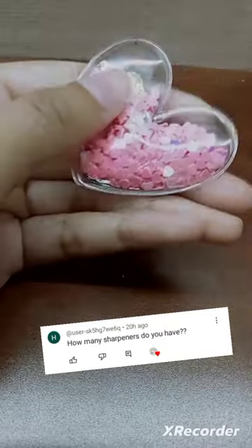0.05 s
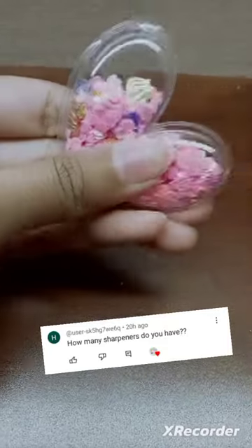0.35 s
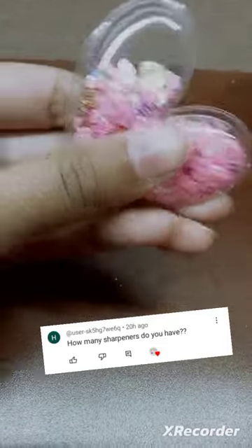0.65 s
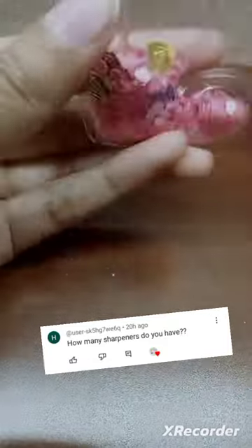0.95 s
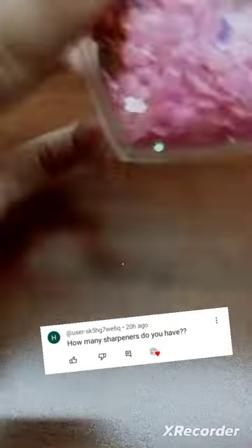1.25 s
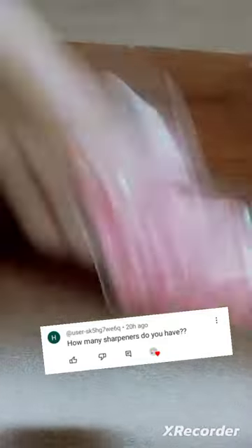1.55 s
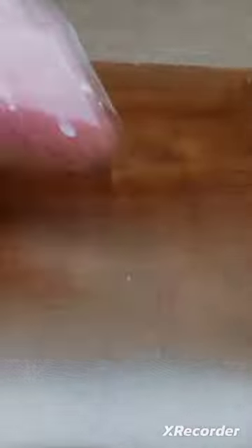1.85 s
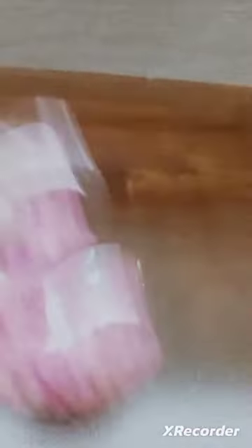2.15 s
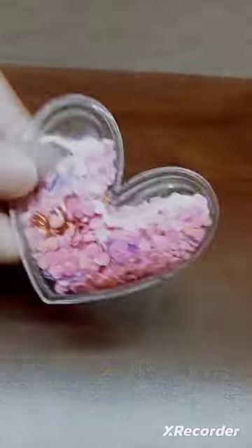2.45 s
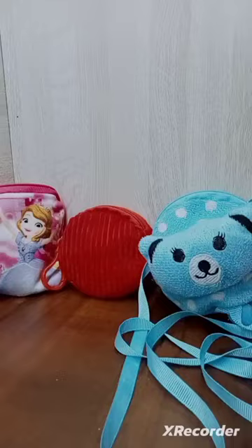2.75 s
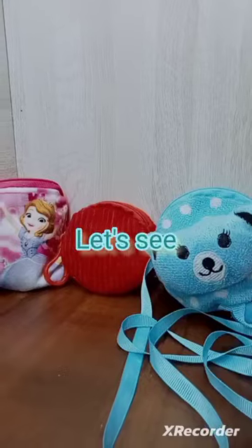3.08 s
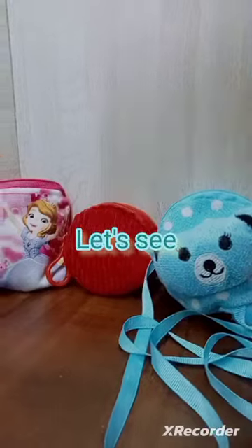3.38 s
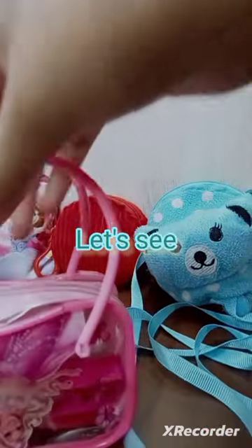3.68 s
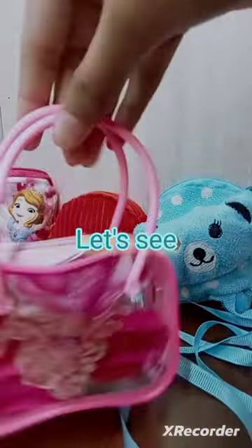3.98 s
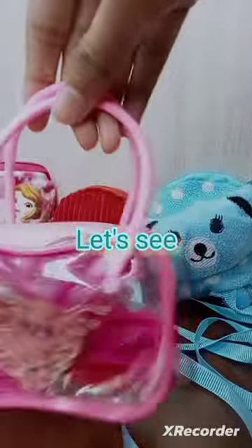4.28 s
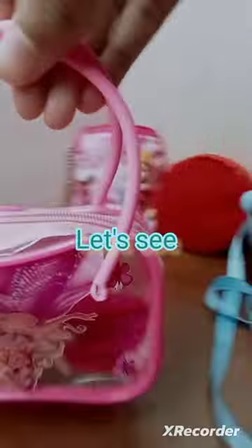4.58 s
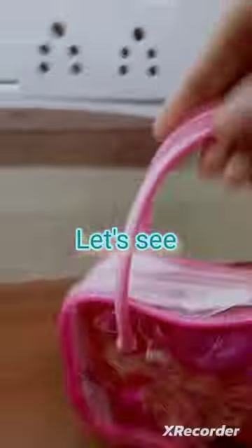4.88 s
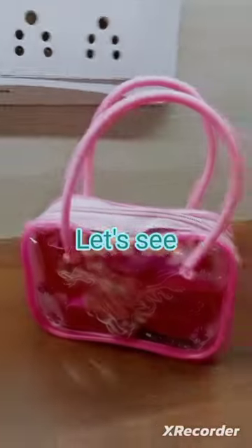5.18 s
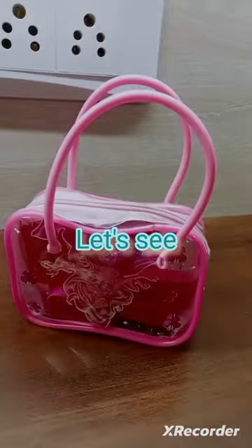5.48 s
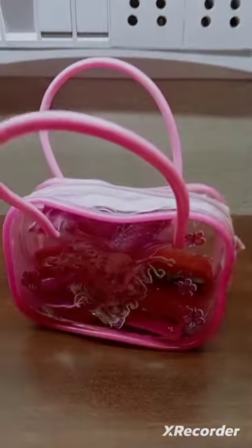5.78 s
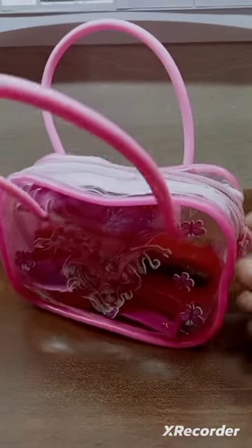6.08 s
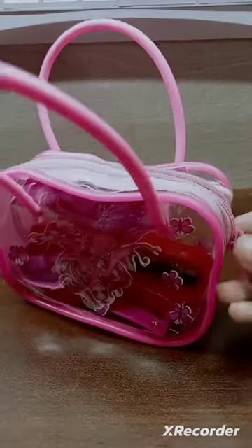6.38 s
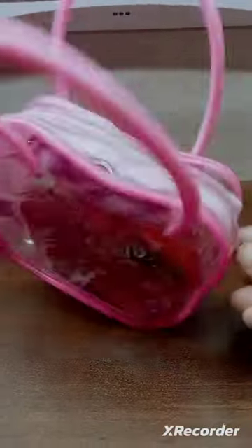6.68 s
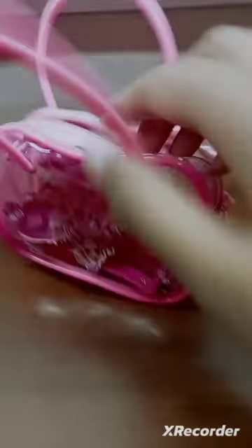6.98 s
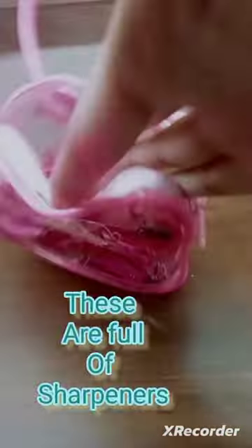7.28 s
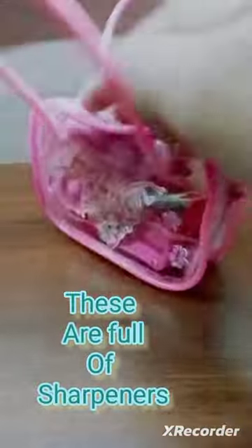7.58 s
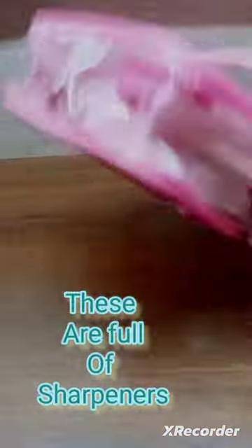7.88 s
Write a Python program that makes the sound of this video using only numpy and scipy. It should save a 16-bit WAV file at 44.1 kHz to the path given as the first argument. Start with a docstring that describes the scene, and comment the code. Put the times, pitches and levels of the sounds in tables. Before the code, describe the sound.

Close handling at a desk: soft sequin shakes, a bag set down with a thud, microphone rubbing, then plastic sharpeners clattering inside crinkling vinyl.

```python
"""Plastic things are handled over a wooden desk, close to a hand-held phone in a small, faintly humming room.
First a clear heart-shaped case ticks and its sequins swish, while shifting fingers bump the phone.
Next a vinyl bag of pencil sharpeners crinkles and scuffs as it is lifted, and is set down with a thud.
A finger then slides twice over the microphone.
Last, the bag is pushed and tipped, and the sharpeners clatter inside."""
import sys
import numpy as np
from scipy import signal
from scipy.fft import rfft, irfft
from scipy.io import wavfile

SR = 44100
rng = np.random.default_rng(int(sys.argv[2]) if len(sys.argv) > 2 else 0)


def waveform_to_disk(signal):
    """Save audio, clipped to [-1, 1], as 16-bit WAV at the path in sys.argv[1]."""
    frames = np.transpose(np.atleast_2d(signal))
    scaled = np.clip(frames, -1, 1) * 32767
    samples = np.round(scaled).astype(np.int16)
    wavfile.write(sys.argv[1], SR, samples)


N = 358974
TIME = np.arange(N) / SR

# the bag's motion in two gestures, carried and then pushed and tipped: time_s, effort_db, treble_db
HANDLING = [
    [(2.72, -62, -69.5), (2.81, -60, -60), (2.964, -53, -64), (3.244, -58, -65), (3.394, -47, -63),
     (3.562, -49.5, -65), (3.712, -39.5, -67), (3.842, -56, -49.5), (3.968, -54.5, -61), (4.29, -51, -57.5),
     (4.45, -45, -56)],
    [(5.5, -70, -69.5), (5.76, -58, -58.5), (6.04, -52.5, -59), (6.29, -47, -56), (6.44, -48.5, -75),
     (6.67, -72, -61), (6.82, -52, -60.5), (7.15, -35.5, -52), (7.81, -44, -56), (7.97, -36.5, -46),
     (8.14, -34.5, -57)],
]
USUAL_HANDLING_DB = -46.5
# knocks of the sharpeners in the bag: start_s, decay_s, level_db, weight_db, hardness_db
KNOCKS = [(2.8447, 0.0043, -47, 0, -6), (3.1707, 0.0019, -32, -17, -11), (3.3997, 0.008, -37.5, -6, -1.5),
          (3.4327, .0045, -46, 0, -0.5), (3.5597, 0.0066, -15, 1, -8), (3.5757, 0.0098, -25, 3, 0.5),
          (3.6097, 0.0043, -31, 2, -3), (3.6517, 0.0071, -34.5, 1, -3), (3.6677, 0.0086, -33.5, -2, 5),
          (3.7287, 0.0046, -29, -0.5, -3.5), (3.7957, .005, -32.5, 0, -1.5),
          (3.8687, .005, -41.5, -5.5, -25), (4.0599, 0.0087, -39.5, -8, -23),
          (4.2612, 0.005, -33, -5.5, -0.5), (4.3317, 0.0028, -43.5, -2.5, -2), (5.588, .002, -54, -10, -3),
          (6.0487, 0.0084, -43, -8, -18), (6.2627, .003, -38, -17, -14), (6.2907, 0.0015, -39, -14, -18),
          (6.3947, 0.0032, -39.5, 0.5, -8), (6.4177, 0.0059, -37.5, -7, -4.5),
          (6.4499, .003, -37, -13.5, -2), (6.6787, 0.027, -26, 0, -1.5), (6.7009, 0.0032, -14, -14.5, -10),
          (6.7167, 0.01, -21, -7, -3.5), (6.7937, 0.0027, -15.5, -6, -9.5), (6.8007, 0.014, -24.5, -7, 0),
          (6.8567, 0.0076, -33.5, -11, -8.5), (7.0697, .0023, -19, -3, -5), (7.0787, 0.015, -31, -5, -5),
          (7.1727, 0.0018, -32.5, -3, -7), (7.3947, 0.017, -29, -8, 1), (7.4087, 0.0088, -34, 1, 5),
          (7.4137, 0.0058, -27, 0, 6.5), (7.4397, 0.011, -29.5, -16, -11), (7.4587, 0.0084, -34, -13, -2),
          (7.5837, 0.004, -42, -18, -3.5), (7.6537, 0.0065, -34, -8, 0), (7.7217, 0.0058, -34, -26, -3.5),
          (7.7437, 0.0068, -37, -4, 6), (7.7599, 0.0054, -41.5, -7, 7), (7.7867, 0.011, -29.5, -23, -9),
          (7.8627, 0.0026, -16.5, -9.5, -4.5), (7.9007, 0.036, -40.5, 5, 10), (7.9322, 0.005, -39, -7, 12),
          (8.0031, 0.0026, -14, -6.5, -16), (8.0241, 0.0081, -27.5, -5, 4.5), (8.0377, 0.019, -26, -1, 9),
          (8.0647, 0.0075, -30, 3, 11.5), (8.1187, 0.0032, -37.5, 2.5, 1.5)]
# broad resonances of plastic shells, narrow ones of steel blades: pitch_hz, bandwidth_hz, gain_db
SHARPENER_MODES = [(298, 170, -7.5), (466, 95, -8), (668, 127, -6.5), (988, 150, 7.5), (1223, 58, 12.5),
                   (1350, 110, 13), (1593, 252, 10), (2150, 470, 3), (3080, 500, 0), (3250, 60, 12),
                   (3620, 520, 0), (4550, 260, -3), (5620, 11, -8), (6200, 62, -3), (6650, 140, 5.5),
                   (6810, 480, 0.5), (7270, 70, 8.5), (7600, 85, -0.5), (7835, 42, 2), (10700, 1600, -25),
                   (15000, 750, -37)]


def from_db(db):
    """Amplitude grows tenfold for every 20 dB."""
    return 10 ** (np.asarray(db) / 20)


def rms_one(x):
    """Division by the root mean square gives unit power."""
    return x / np.sqrt(np.mean(x ** 2) + 1e-20)


def band(x, low_hz, high_hz, order=3):
    """A causal band-pass filter attenuates what lies outside its two edges."""
    return signal.sosfilt(signal.butter(order, [low_hz, high_hz], "band", fs=SR, output="sos"), x)


def drift(knots_per_s):
    """Interpolation between random values gives a smooth fluctuation of unit power."""
    knots = rng.standard_normal(int(knots_per_s * N / SR) + 2)
    return rms_one(np.interp(TIME * knots_per_s, np.arange(len(knots)), knots))


def swell(centre_s, half_s):
    """A Gaussian envelope rises and falls symmetrically about its centre."""
    return np.exp(-np.minimum(((TIME - centre_s) / half_s) ** 2 / 2, 20))


def swells(rows):
    """Short envelopes add by superposition."""
    return sum(from_db(db) * swell(centre_s, half_s) for centre_s, half_s, db in rows)


def effort(gestures, usual_db):
    """Interpolation in decibels gives a gain per level column, relative to usual; silent between gestures."""
    gains = 0
    for rows in gestures:
        times_s, *columns = np.transpose(rows)
        gains += from_db([np.interp(TIME, times_s, db - usual_db, left=-200, right=-200) for db in columns])
    return gains


def coloured(x, spectrum):
    """Spectral shaping, with a bass roll-off below the first point; the result has unit power."""
    hz, db = np.transpose(spectrum)
    bins_hz = np.maximum(np.fft.rfftfreq(N, 1 / SR), 1)
    skirt = np.minimum(bins_hz / hz[0], 1) ** 2
    shape = from_db(np.interp(np.log(bins_hz), np.log(hz), db))
    return rms_one(irfft(rfft(x) * skirt * shape, N))


def resonate(x, modes, tuning=1, uneven_db=0):
    """Modal superposition: damped resonators respond in parallel, with alternating signs."""
    out = 0
    for k, (hz, width_hz, db) in enumerate(modes):
        radius = np.exp(-np.pi * width_hz / SR)
        zeros = np.array([1, 0, -1]) * (1 - radius ** 2) / 2
        poles = [1, -2 * radius * np.cos(2 * np.pi * hz * tuning / SR), radius ** 2]
        strength = from_db(db + uneven_db * rng.standard_normal())
        out += (-1) ** k * strength * signal.lfilter(zeros, poles, x + 1e-18)
    return out


def grains(per_s, spread_db):
    """Shot noise: tiny contacts of uneven size arrive at random moments."""
    sizes = from_db(spread_db * np.minimum(rng.exponential(1, N), 4)) * rng.choice([-1, 1], N)
    return rms_one(sizes * (rng.random(N) < per_s / SR))


def two_registers(x, low_gain, high_gain):
    """A crossover near 5 kHz gives the lower and upper bands separate envelopes."""
    return low_gain * rms_one(band(x, 100, 5000)) + high_gain * rms_one(band(x, 5200, 17000))


def blows(rows, modes, first_contact, chatter_db, crack_db, tick_db, tick_follows, cover=lambda x: x):
    """Impact excitation: a hard contact and a dying chatter ring an object's modes, heard through a cover."""
    # limits of the body, clack, snap and tick registers: edge_hz
    edges_hz = [150, 700, 2400, 5000, 15500]
    chatter_rise_s = 0.00098  # loose pieces start to move just after the first contact
    t = TIME[:SR // 10]
    start_s, decay_s, level_db, weight_db, hardness_db = np.transpose(rows)
    size = (len(rows), len(t))
    chatter = rng.standard_normal(size)
    chatter = rms_one(chatter * from_db(chatter_db * rng.standard_normal(size).clip(-2, 2)))
    force = (1 - np.exp(-t / chatter_rise_s)) * np.exp(-t / decay_s[:, None]) * chatter
    force[:, 0] = first_contact
    # no two contacts hit the same piece at the same spot
    ringing = np.array([resonate(f, modes, tuning=rng.normal(1, .008), uneven_db=4) for f in force])
    radiated = cover(ringing + from_db(crack_db) * force)
    # a heavy contact adds body, a hard one adds snap and tick
    registers_db = level_db + np.array(
        [weight_db, np.zeros(len(rows)), hardness_db, tick_db + tick_follows * hardness_db])
    sounds = 0
    for db, low_hz, high_hz in zip(registers_db, edges_hz, edges_hz[1:]):
        part = band(radiated, low_hz, high_hz)
        rms = np.sqrt(np.sum(part ** 2, axis=1) * 100 / SR)  # energy counted over 10 ms
        sounds += part * (from_db(db) / rms)[:, None]
    out = np.zeros(N + len(t))
    for start, sound in zip(np.round(start_s * SR).astype(int), sounds):
        out[start:start + len(t)] += sound
    return out[:N]


def background(air_db=-61, hum_db=-70.5, hum_hz=110.6, waver_hz=2.7):
    """Room air is stationary noise; a faint motor hum wavers by frequency modulation."""
    # spectrum of the room air: frequency_hz, density_db
    spectrum = [(25, -21), (60, -14.5), (120, -2), (240, -9.5), (320, -16.5), (500, -16), (780, -26),
                (1000, -19.5), (1700, -21.5), (2500, -22.5), (3300, -19.5), (5100, -41), (7200, -27),
                (10500, -43), (15500, -43)]
    air = coloured(rng.standard_normal(N), spectrum)
    air /= np.std(band(air, 250, 15500))  # air_db is the level within this band
    hum = np.sqrt(2) * np.sin(2 * np.pi * np.cumsum(hum_hz + waver_hz * drift(45)) / SR)
    return from_db(air_db) * air + from_db(hum_db) * hum


def heart_case():
    """Free vibration: each light contact leaves the plastic case ringing briefly in its modes."""
    # ticks of the case: start_s, decay_s, level_db, weight_db, hardness_db
    ticks = [(0.0517, 0.013, -47, -13, 0.5), (0.0977, 0.011, -45, -23, -2), (0.1297, 0.0043, -45, -15, 7.5),
             (0.2877, 0.0021, -45, -13, -5.5), (0.4447, 0.0019, -47, -25, 2),
             (0.4542, 0.0011, -37.5, -16, 6), (0.6367, 0.0029, -47, -21, -6), (0.7097, 0.012, -43, -15, 0),
             (0.7887, 0.0022, -49.5, -6, -4), (1.6507, 0.0047, -51.5, 9, 0)]
    # resonances of the case: pitch_hz, bandwidth_hz, gain_db
    modes = [(370, 27, -9), (603, 42, -13.5), (1540, 560, -2), (1680, 230, 2.5), (2070, 390, -6.5),
             (2600, 1030, -4), (3230, 270, 5), (6100, 820, -18), (7100, 460, 2.5), (8950, 1500, -6.5),
             (15100, 1100, -6)]
    return blows(ticks, modes, first_contact=3.7, chatter_db=0, crack_db=-39, tick_db=-8, tick_follows=0.55)


def sequins(slide_lead_s=0.041, slide_half_s=0.015, landing_rise_s=0.0017, landing_decay_s=0.01):
    """Granular noise: each shake slides the sequins across the case and throws them against its wall."""
    # shakes of the case: landing_s, slide_db, landing_db
    shakes = [(0.128, -71, -42), (1.121, -58, -50.5), (1.237, -56.5, -40.5), (1.294, -56.5, -52),
              (1.449, -53, -40.5), (1.587, -49, -39), (1.729, -51.5, -38.5), (1.851, -54, -41),
              (1.971, -57.5, -42), (2.09, -52, -40)]
    # spectrum of the sequins' contacts: frequency_hz, density_db
    spectrum = [(500, -3), (930, -16), (1200, -10), (1730, 0), (2320, -8), (3370, -0.5), (4200, -11.5),
                (5270, -22.5), (7200, -4.5), (9000, -12.5), (12000, -19.5), (14900, -10), (15800, -11.5)]
    envelope = from_db(-66.5) * swell(centre_s=1.34, half_s=0.19)  # trickle between the shakes
    envelope += from_db(-53.5) * swell(centre_s=2.376, half_s=0.034)  # last slide as the case is turned
    for landing_s, slide_db, landing_db in shakes:
        age_s = np.clip(TIME - landing_s, 0, 1)
        landing = (1 - np.exp(-age_s / landing_rise_s)) * np.exp(-age_s / landing_decay_s)
        envelope += from_db(slide_db) * swell(landing_s - slide_lead_s, slide_half_s)
        envelope += from_db(landing_db) * landing
    contacts = coloured(grains(per_s=3000, spread_db=2), spectrum)
    return two_registers(contacts, envelope, from_db(-2.5) * envelope)


def grip(wander=0.15, rumble_db=-7):
    """Structure-borne sound: fingers judder on the phone's body in short, unsteady hums with some rumble."""
    # bumps of the shifting fingers: centre_s, half_length_s, pitch_hz, level_db
    bumps = [(1.091, 0.016, 116, -49.5), (1.407, 0.014, 215, -42), (1.448, 0.034, 159, -48),
             (1.57, 0.05, 169.5, -48), (2.873, 0.028, 115, -58.5), (4.545, 0.025, 168.4, -41),
             (4.753, 0.026, 111, -38.5), (4.938, 0.018, 108.3, -34.5), (5.162, 0.043, 174.5, -43.5),
             (5.315, 0.026, 114.6, -51.5), (5.684, .012, 111.5, -54), (5.782, 0.017, 110, -56),
             (6.688, 0.012, 167, -41), (7.05, 0.039, 151.4, -48)]
    warped_s = np.cumsum(1 + wander * drift(70)) / SR
    rumble = from_db(rumble_db) * rms_one(band(rng.standard_normal(N), 70, 257, order=2))
    out = 0
    for centre_s, half_s, hz, db in bumps:
        hum = np.sqrt(2) * np.sin(2 * np.pi * hz * warped_s)
        out += from_db(db) * swell(centre_s, half_s) * (hum + rumble)
    return out


def vinyl_bag(crumple_db=-53.5, crackle_db=-46, clump_db=4, jostle_db=-3, drag_db=-60):
    """Buckling: creases give way in clumps, as the same motion jostles the sharpeners and drags the bag."""
    # single folds of the vinyl buckling: centre_s, half_length_s, level_db
    buckles = [(5.945, 0.028, -42), (6.16, 0.061, -56.5), (6.64, 0.026, -37.5), (6.745, 0.0093, -47),
               (6.975, 0.011, -39.5), (7.21, 0.0073, -32.5), (7.28, 0.004, -37), (7.37, 0.011, -33.5),
               (7.565, 0.028, -42.5), (7.812, 0.0075, -31.5), (8.09, 0.0086, -47)]
    # spectrum of the creasing vinyl: frequency_hz, density_db
    spectrum = [(150, -20), (250, -5), (347, 1.5), (553, -5), (929, 4), (1290, 0), (1670, 1.5), (2620, -2),
                (3280, -5.5), (5130, -31), (7000, -19), (9720, -36.5), (11600, -38.5), (14700, -37),
                (15500, -36)]
    motion, treble = effort(HANDLING, USUAL_HANDLING_DB)
    # the wall rustles around each listed knock, but can give only so far
    give_lead_s, give_half_s = 0.0016, 0.0081
    gives = [(s - give_lead_s, give_half_s, min(db - 16.5, -44.5)) for s, _, db, _, _ in KNOCKS]
    folds = from_db(-1.5) * swells(buckles + gives)
    crumple = from_db(crumple_db) * motion + folds
    crackle = from_db(crackle_db) * treble + from_db(-10.5) * folds
    creases = coloured(grains(per_s=16000, spread_db=2.5) * from_db(clump_db * drift(110)), spectrum)
    # each small contact rings only one of three groups of modes, so the nudges differ in pitch
    nudges = sum(resonate(grains(per_s=50, spread_db=3), SHARPENER_MODES[k::3]) for k in range(3))
    jostle = from_db(jostle_db) * rms_one(band(nudges, 550, 3850, order=7))
    rumble = rms_one(band(rng.standard_normal(N), 99, 230, order=2))
    drag = from_db(drag_db) * motion ** 0.61 * rumble
    return two_registers(creases + jostle, crumple, crackle) + drag


def rattles(per_s=16, decay_s=0.0037, spread_db=2, motion_exponent=1.2):
    """A Poisson process times stray small knocks, whose strength grows with the bag's motion."""
    motion, _ = effort(HANDLING, USUAL_HANDLING_DB)
    scatter_db = spread_db * rng.standard_normal((400, 3)).clip(-2, 2)
    handling_start_s = HANDLING[0][0][0]
    times_s = handling_start_s + np.cumsum(rng.exponential(1, len(scatter_db))) / per_s
    rows = []
    for start_s, (level_db, weight_db, hardness_db) in zip(times_s, scatter_db + [-49.5, -12.5, -4]):
        if start_s < TIME[-1]:
            motion_db = motion_exponent * 20 * np.log10(motion[int(start_s * SR)])
            rows.append((start_s, decay_s, level_db + motion_db, weight_db, hardness_db))
    return rows


def bag_wall(x, cutoff_hz=8300, leak_db=-10.5):
    """Transmission loss: the vinyl wall lets only a little of the highest treble out."""
    wall = signal.butter(6, cutoff_hz, fs=SR, output="sos")
    return signal.sosfilt(wall, x) + from_db(leak_db) * x


def sharpeners():
    """Collisions excite the modes of plastic shells and steel blades, heard through the bag."""
    return blows(KNOCKS + rattles(), SHARPENER_MODES, first_contact=5.5, chatter_db=5.5,
                 crack_db=-13, tick_db=-4.5, tick_follows=1.66, cover=bag_wall)


def bag_scuffs():
    """Sliding friction: clouds of tiny contacts swell and fade as the bag is picked up."""
    # short slides of the bag: centre_s, half_length_s, level_db
    slides = [(2.885, 0.028, -50.5), (2.99, 0.021, -47), (3.021, 0.0065, -32.5), (3.173, 0.0053, -26),
              (3.355, 0.03, -42), (3.47, .016, -37)]
    # hollow spectrum of a scuff: frequency_hz, density_db
    spectrum = [(350, -11.5), (600, -2), (950, 5), (1300, -9.5), (1800, -16), (3300, -13), (5100, -31),
                (7000, -16), (12000, -43), (15500, -30)]
    envelope = swells(slides)
    contacts = coloured(grains(per_s=1000, spread_db=3), spectrum)
    return two_registers(contacts, envelope, from_db(-20) * envelope)


def desk():
    """Impulse response: the weight of the bag sets the desk's low modes swinging, and they decay."""
    # blows of the bag on the desk: start_s, level_db
    thumps = [(3.56, -24.5), (3.5789, -24.5), (6.793, -32.5)]
    # resonances of the desk: pitch_hz, gain_db, t60_s
    modes = [(109.7, 7, 0.14), (166, -15.5, 0.14), (315, -29, 0.098), (737, -4, 0.11)]
    impulses, t = np.zeros(N), TIME[:SR // 2]
    for start_s, db in thumps:
        impulses[round(start_s * SR)] = from_db(db)
    swing = sum(from_db(db - 60 * t / t60_s) * np.sin(2 * np.pi * hz * t) for hz, db, t60_s in modes)
    return band(signal.fftconvolve(impulses, swing)[:N], 78, 1350)


def finger_rub(friction_db=-28, hiss_db=-29, boom_db=-37, slip_db=1.5, fade_db_per_s=241.5):
    """Stick-slip friction of skin on the microphone port shakes the casing; pressure adds level and hiss."""
    # finger pressure in two strokes: time_s, pressure_db
    strokes = [
        [(4.45, -56), (4.476, -30.5), (4.544, -19), (4.576, -26), (4.616, -23), (4.712, -30), (4.728, -17),
         (4.74, -37), (4.75, -43), (4.8, -56)],
        [(4.8, -57.5), (4.842, -16), (4.876, -20), (4.922, -29), (4.958, -28.5), (4.966, -23.5), (5.074, -25.5),
         (5.104, -36), (5.302, -44), (5.4, -59)],
    ]
    # spectrum of the skin's friction: frequency_hz, density_db
    spectrum = [(350, -11), (500, -15), (880, -13.5), (1200, -9), (2200, -7.5), (2660, -10.5), (3350, -2.5),
                (4340, -8), (5200, -25), (6000, -14), (7070, 0), (8700, -3.5), (11000, -0.5), (13800, 8.5),
                (15600, 4.5)]
    # resonances of the phone's casing: pitch_hz, bandwidth_hz, gain_db
    casing_modes = [(170.5, 22, 4.5), (299, 41, 3.5), (348, 29, 3)]
    pressure, = effort(strokes, usual_db=-26.5)
    friction = coloured(grains(per_s=9000, spread_db=1.5) * from_db(slip_db * drift(350)), spectrum)
    rub = two_registers(friction, from_db(friction_db) * pressure, from_db(hiss_db) * pressure ** 1.3)
    # the casing goes on shaking as the finger lifts
    fade_db = fade_db_per_s * TIME
    shaking_db = np.maximum.accumulate(20 * np.log10(pressure) + fade_db) - fade_db
    boom = rms_one(band(resonate(rng.standard_normal(N), casing_modes), 107, 520))
    return rub + boom * from_db(shaking_db + boom_db)


def room(x, t60_s=0.22, delay_s=0.006, level_db=-17):
    """Reverberation: walls a metre or two away return a short diffuse tail."""
    t = TIME[:SR // 2]
    tail = band(rng.standard_normal(len(t)), 250, 10860) * from_db(-60 * t / t60_s) * (t > delay_s)
    return from_db(level_db) * signal.fftconvolve(x, tail / np.linalg.norm(tail))[:N]


def scene():
    """All sources superpose at one microphone, carried on both channels; only the objects reverberate."""
    impacts = from_db(0.7) * heart_case() + from_db(0.67) * sharpeners()
    rustles = from_db(1.5) * sequins() + from_db(-2.5) * bag_scuffs() + vinyl_bag()
    objects = impacts + rustles + desk()
    phone = finger_rub() + from_db(7.5) * grip()
    mono = objects + room(objects) + phone + background()
    return np.stack([mono, mono])


def record(dry, ceiling=1.3, cutoff_hz=15800):
    """Soft saturation rounds the highest peaks, and a steep low-pass filter cuts the top."""
    low_pass = signal.ellip(12, .1, 90, cutoff_hz, fs=SR, output="sos")
    return signal.sosfilt(low_pass, ceiling * np.tanh(dry / ceiling))


dry = scene()
out = record(dry)
waveform_to_disk(out)
```